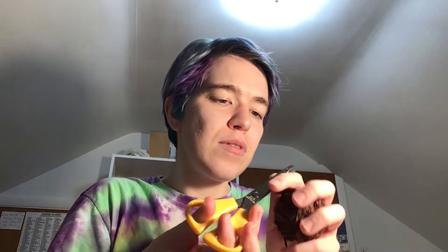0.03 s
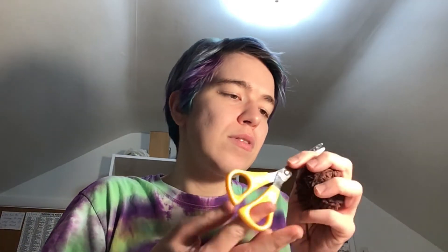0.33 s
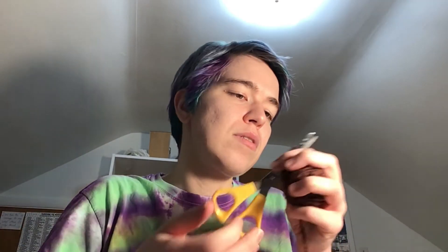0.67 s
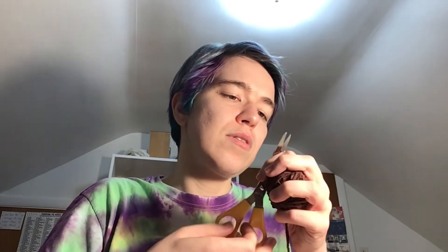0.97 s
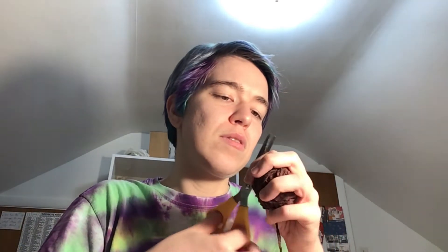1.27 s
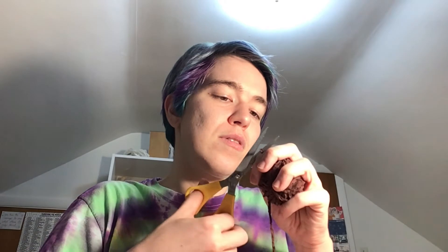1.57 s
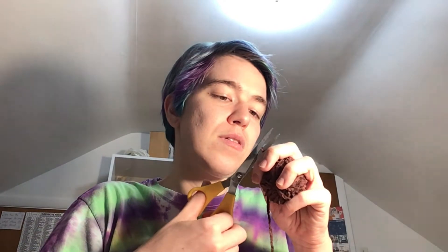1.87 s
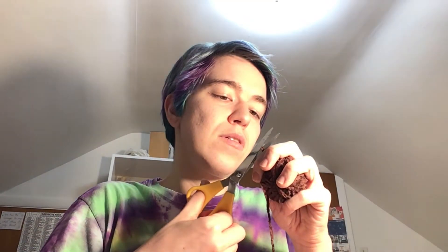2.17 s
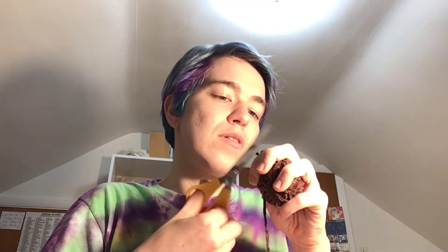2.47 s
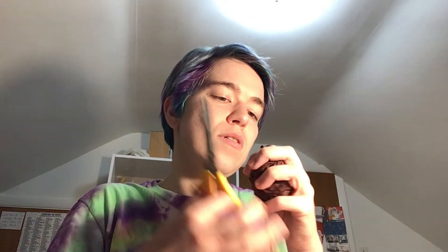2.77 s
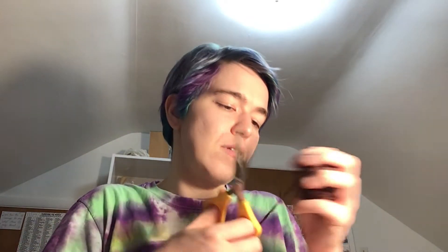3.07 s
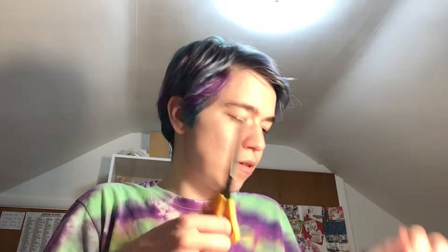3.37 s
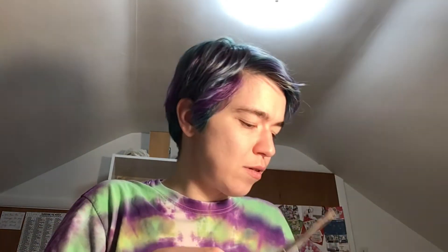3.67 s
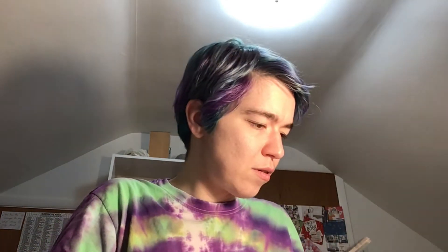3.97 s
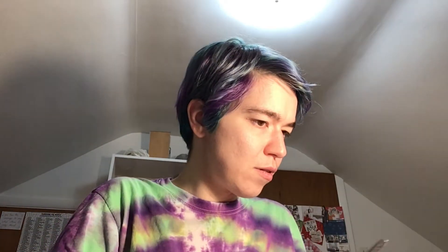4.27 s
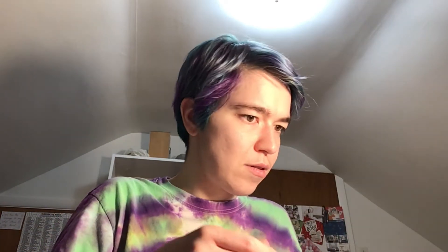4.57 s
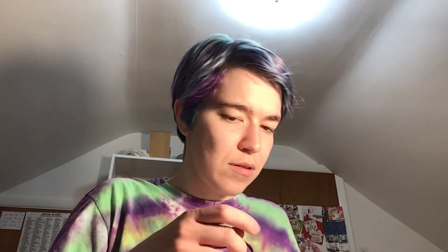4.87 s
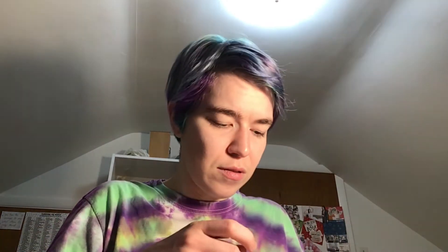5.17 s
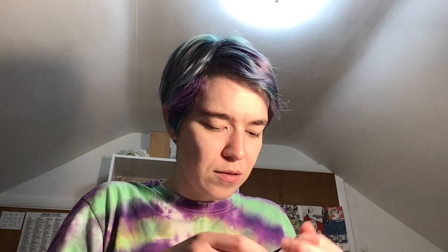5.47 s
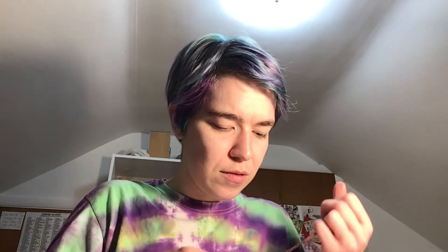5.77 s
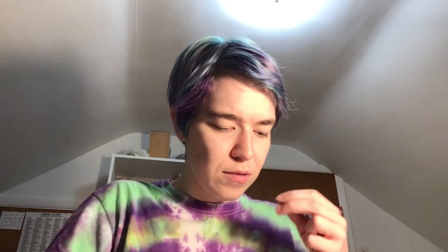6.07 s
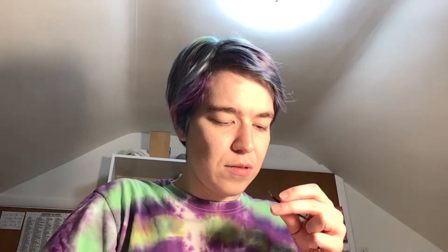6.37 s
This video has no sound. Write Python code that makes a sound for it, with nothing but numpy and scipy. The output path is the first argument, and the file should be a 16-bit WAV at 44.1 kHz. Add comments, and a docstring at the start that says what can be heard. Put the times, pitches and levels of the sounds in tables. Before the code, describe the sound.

Sparse, light clicks of scissor blades and a gentle cut through yarn sound over the faint hush of a small room. The loudest moment follows: a sharp double knock with a short metallic ring as the scissors land on a wooden desk right by the microphone. Afterwards comes a barely audible hiss of thread being pulled, then a soft thump and a sleeve sliding on the desk.

```python
"""Scissors put down on a wooden desk, close to the microphone: two loud knocks ring the board and the
steel, with a clack of the blades between them. The place is a small, quiet attic room, heard in mono.
Before that, in the hand and with more room around them, the scissors tick and shear softly at yarn.
Afterwards thread is drawn through the fingers, and a forearm bumps the desk and slides along it;
the rubbing is fibres catching and slipping. Faint room tone lies under it all."""
import sys
import numpy as np
from scipy import signal
from scipy.fft import rfft, irfft
from scipy.io import wavfile

SR = 44100
rng = np.random.default_rng(int(sys.argv[2]) if len(sys.argv) > 2 else 0)


def wrap_up_sound(samples):
    """Save the sound to the file named by the first command line argument, as 16-bit audio."""
    columns = np.atleast_2d(samples).T
    # keep every value between -1 and 1, then stretch to whole-number steps
    tamed = np.clip(columns, -1, 1)
    steps = np.round(tamed * 32767).astype(np.int16)
    wavfile.write(sys.argv[1], SR, steps)


N = 287687
TIME = np.arange(N) / SR
BLOCK = 32768   # samples for one hit and its tail
HZ = np.maximum(np.arange(BLOCK // 2 + 1) * SR / BLOCK, 1)

# rumble and hiss of the still attic: f/Hz, level/dB
ROOM_TONE = [(26, -37.5), (45, -7.5), (70, 0), (101, -3.5), (226, -9), (334, -11.5), (506, -15.5),
             (866, -18.5), (1560, -20), (2040, -22), (2730, -21), (4790, -25), (6590, -26.5),
             (10500, -29.5), (15500, -36)]
# decay of the attic's echoes: f/Hz, t60/s
ROOM_DECAY = [(150, .42), (300, .31), (600, .23), (2000, .21), (15000, .19)]
# strokes of blades through yarn, thread between fingers, sleeve on desk: peak t/s, level/dB, length/s
YARN_CUTS = [(2.788, -69, .04), (2.824, -64.5, 0.072), (2.953, -77, .11)]
THREAD_PULLS = [(5.29, -80, 0.31), (5.59, -74.5, 0.47), (5.735, -75, .3)]
SLEEVE_RUBS = [(6.174, -52, 0.027), (6.234, -53, 0.038), (6.256, -54, 0.053), (6.33, -59.5, 0.23),
               (6.38, -55.5, 0.064), (6.402, -62.5, 0.2)]
# spectra of those three kinds of rubbing: f/Hz, level/dB
YARN_SPECTRUM = [(2000, -25.5), (5000, -18), (6600, -2), (8000, -4), (9600, -1), (11000, -11.5),
                 (12800, 0.5), (16000, -14)]
THREAD_SPECTRUM = [(1500, -20.5), (4000, 2), (7000, -4), (13000, -0.5), (16000, -6.5)]
SLEEVE_SPECTRUM = [(60, 2), (170, 11), (300, -1), (440, 8.5), (620, -3.5), (1100, -6.5), (1500, 1.5),
                   (1950, 0), (2400, -9.5), (3200, -1), (4500, -13.5), (9000, -18.5), (16000, -28.5)]
# modes of the steel blades and plastic handles: f/Hz, width/Hz, level/dB
SCISSOR_MODES = [(1863, 350, -6), (2957, 550, 0.5), (3900, 520, -2.5), (5050, 900, -4.5), (6850, 970, -1),
                 (9100, 740, 0.5), (11300, 650, -4.5), (13130, 1500, -13.5)]
# scissor contacts: t/s, strength/dB, main mode f/Hz, main mode level/dB
SCISSOR_TICKS = [(0.4948, -35.5, 3430, -1), (0.5012, -37, 3000, -5), (1.3527, -28.5, 13100, 9),
                 (1.3572, -28.5, 13200, 6), (1.36, -35.5, 7400, 13), (2.297, -27.5, 14400, 3),
                 (2.2986, -38, 452, 26.5), (3.3823, -27, 4700, 14.5), (3.3829, -25.5, 12200, 3),
                 (4.7076, -5.5, 9300, -10.5), (4.7077, -10, 1820, 12.5), (4.711, -22.5, 6700, 6.5),
                 (4.7635, -11, 8860, -10), (6.1777, -39.5, 390, 34.5)]
# modes of the desk top, struck at two spots: f/Hz, width/Hz, first spot level/dB, second spot level/dB
BOARD_MODES = [(71.8, 40, -15, -12), (122.7, 45, -11.5, -6.5), (191, 26, -0.5, 3), (222, 75, 0.5, -8.5),
               (312, 72.1, 2, -9), (348, 20, -13, 0.5), (412, 60, -7.5, -7.5), (495, 220, -15.5, -9),
               (580, 30.1, -31.5, -30), (646, 6.1, -10.5, -7.5), (767, 67, -2, -2), (1090, 140, -9, -14),
               (1447, 170, 0.5, -9), (1696, 170, 2.5, -9), (1980, 210, -8, -1.5), (2382, 390, -14.5, 1.5),
               (2810, 180, 0.5, 0), (3100, 260, -16.5, -1.5), (3830, 260, -24, -7.5),
               (4417, 250, -8, -22.5), (4600, 700, -24.5, -10), (5615, 280, -17.5, -12),
               (6720, 460, -21, -14.5), (8650, 1300, -25.5, -25), (12500, 3000, -24.5, -22.5)]
# fine ring of scissors and other steel on the desk: f/Hz, t60/s, first spot level/dB, second spot level/dB
STEEL_MODES = [(696, .7, -5, 0), (1130, .7, -3.5, -6), (1442, .2, 1.5, -7.5), (1970, 0.71, -7, -12),
               (2390, 0.15, -15.5, -0.5), (2600, .22, -14.5, -6.5), (2640, .22, -4, -14.5),
               (2918, 0.2, -5.5, -5), (3300, 0.19, -17, -1), (3400, .12, -20, -5.5), (4250, .15, -19, -6),
               (4802, .15, -22, -17), (6272, .2, -25, -19.5), (7500, .18, -22, -19.5),
               (8200, 0.19, -21, -13.5)]
# room against direct sound at the first spot, weakest where the board carries best: f/Hz, level/dB
BOARD_ECHO = [(150, -5.5), (400, -6), (800, -3.5), (1600, -12), (5000, -11), (9000, -1.5), (14000, 0)]
# blows on the desk: t/s, strength/dB, contact corner f/Hz, place (0 first spot, 1 second), steel ring/dB
DESK_BLOWS = [(0.4953, -14.5, 600, 0.7, -20), (4.6151, 21, 4414, 0.12, -9), (4.7087, -1.5, 1494, 0.42, -10),
              (4.7279, -3, 5010, 0.64, 21), (4.7583, 16, 4600, 0.95, -0.5),
              (4.7604, 10.5, 4000, 0.36, -8.5), (6.1747, 12, 150, 0.88, -21), (6.1870, 20.5, 90, 0.54, -18),
              (6.23, -7, 120, 0.7, -20), (6.379, -2.5, 454, 0.94, -20)]


def from_db(db):
    """Decibels to gain."""
    return 10 ** (np.asarray(db) / 20)


def at_hz(points, hz):
    """Read a table on a log-frequency axis."""
    f, value = np.transpose(points)
    return np.interp(np.log(np.maximum(hz, 1)), np.log(f), value)


def add(track, s, sound):
    """Mix a sound in at time s."""
    start = round(s * SR)
    track[start:start + len(sound)] += sound[:N - start]


def coloured(x, spectrum):
    """Give x a spectrum; rms 1."""
    hz = np.arange(N // 2 + 1) * SR / N
    y = irfft(rfft(x) * from_db(at_hz(spectrum, hz)), N)
    return y / np.std(y)


def resonance(hz, width):
    """Response of one damped mode, 1 on top."""
    return 1 / (1 + 1j * (HZ ** 2 - hz ** 2) / (HZ * width))


def room_tone(level_db=-66):
    """The still attic: a steady, faint rumble and hiss."""
    return from_db(level_db) * coloured(rng.standard_normal(N), ROOM_TONE)


def wall_echoes(first_echo_s=0.0013, build_s=.003):
    """Response of dense echoes off the near walls, each octave dying at its own rate."""
    t = np.arange(BLOCK) / SR
    white = rfft(rng.standard_normal(BLOCK))
    swell = 1 - np.exp(-np.maximum(t - first_echo_s, 0) / build_s)
    octaves_hz = np.geomspace(62.5, 16000, 9)
    out = 0
    for hz, pick in zip(octaves_hz, np.eye(len(octaves_hz))):
        band = np.interp(np.log(HZ), np.log(octaves_hz), pick)
        decay = np.exp(-np.log(1000) * t / at_hz(ROOM_DECAY, hz))
        tail = irfft(white * band) * swell * decay
        out = out + tail * np.sqrt(np.mean(band ** 2) / np.sum(tail ** 2))
    return rfft(out)


def stroke_envelope(strokes, rise_share, edge_db=-20):
    """Each stroke swells from edge_db for a share of its length, then fades, evenly in dB."""
    power = 0
    for s, db, length_s in strokes:
        from_peak = np.maximum((s - TIME) / rise_share, (TIME - s) / (1 - rise_share)) / length_s
        power = power + from_db(db + edge_db * np.minimum(from_peak, 10)) ** 2
    return np.sqrt(power)


def fibre_friction(strokes, spectrum, slips_per_s, spread_db, rise_share):
    """Fibres catch and let go in dense slips of uneven size."""
    sizes = from_db(spread_db * np.minimum(rng.exponential(1, N), 4)) * rng.standard_normal(N)
    slips = sizes * (rng.random(N) < slips_per_s / SR)
    return coloured(slips, spectrum) * stroke_envelope(strokes, rise_share)


def chatter(decay_s, above_hz):
    """Hard parts skid for a moment as they meet, which roughens the treble of a hit."""
    burst = rng.standard_normal(BLOCK) * np.exp(-np.arange(BLOCK) / SR / decay_s)
    return rfft(burst / np.sqrt(np.sum(burst ** 2))) / (1 - 1j * above_hz / HZ)


def scissor_ticks(put_down_s=4.6, held_room_db=-4.5, lying_room_db=-10.5, lowest_hz=1200):
    """Hard little contacts ring the blades; where they touch decides which mode stands out."""
    out = np.zeros(N)
    body = sum((-1) ** k * from_db(db) * resonance(hz, width)
               for k, (hz, width, db) in enumerate(SCISSOR_MODES))
    body = body / (1 - 1j * lowest_hz / HZ)   # a small object radiates little bass
    wall_tilt_db = 1.6 * np.log2(HZ / 7000)   # the walls return more of a tick's treble than of its thud
    for s, db, ring_hz, ring_db in SCISSOR_TICKS:
        # the main mode swings a quarter cycle apart from the rest
        quarter_turn = (HZ + 1j * ring_hz) / (HZ - 1j * ring_hz)
        main_mode = from_db(ring_db) * resonance(ring_hz, width=230 + 0.17 * ring_hz) ** 2 * quarter_turn
        force = 1 + from_db(-0.5) * chatter(decay_s=0.00218, above_hz=1400)
        room_db = held_room_db if s < put_down_s else lying_room_db   # drier down by the microphone
        echoes = from_db(room_db + wall_tilt_db) * wall_echoes()
        add(out, s, from_db(db) * irfft(force * (body + main_mode) * (1 + echoes)))
    return out


def soft_contact(corner_hz):
    """A contact of finite length excites little above its corner."""
    return 1 / (1 + 1j * np.sqrt(2) * HZ / corner_hz - (HZ / corner_hz) ** 2)


def steel_ring(place, lowest_hz=1880):
    """Small steel things on the desk ring on after a blow, radiating little below lowest_hz."""
    modes = sum(from_db(first_db + place * (second_db - first_db))
                * resonance(hz, width=np.log(1000) / (np.pi * t60))
                for hz, t60, first_db, second_db in STEEL_MODES)
    return modes / (1 - 1j * np.sqrt(2) * lowest_hz / HZ - (lowest_hz / HZ) ** 2)


def desk_knocks(bass_lag_s=.016, half_lag_hz=100, second_spot_echo_db=4.0):
    """Blows ring the board; bending waves carry treble faster than bass, so each knock chirps down."""
    out = np.zeros(N)
    travel = np.exp(-2j * np.pi * bass_lag_s * half_lag_hz * np.log(1 + HZ / half_lag_hz))
    for s, db, corner_hz, place, ring_db in DESK_BLOWS:
        board = sum((-1) ** k * from_db(first_db + place * (second_db - first_db)) * resonance(hz, width)
                    for k, (hz, width, first_db, second_db) in enumerate(BOARD_MODES))
        steel = from_db(ring_db) * steel_ring(place)
        force = soft_contact(corner_hz) * (1 + from_db(-4.5) * chatter(decay_s=0.0077, above_hz=4200))
        echoes = from_db(at_hz(BOARD_ECHO, HZ) + place * second_spot_echo_db) * wall_echoes()
        add(out, s, from_db(db) * irfft(force * travel * (board * (1 + echoes) + steel)))
    return out


def scene():
    """What reaches the microphone at the desk: knocks, ticks and soft rubbing over the room tone."""
    yarn = fibre_friction(YARN_CUTS, YARN_SPECTRUM, slips_per_s=5200, spread_db=5, rise_share=.3)
    thread = fibre_friction(THREAD_PULLS, THREAD_SPECTRUM, slips_per_s=5000, spread_db=-1, rise_share=.55)
    sleeve = fibre_friction(SLEEVE_RUBS, SLEEVE_SPECTRUM, slips_per_s=10000, spread_db=1, rise_share=.25)
    air = room_tone()
    return (desk_knocks() + scissor_ticks() + yarn + thread + sleeve + air)[None]


def record(dry, low_cut_hz=50, high_cut_hz=15900):
    """The microphone drops the deep bass; the top is cut steeply."""
    low_cut = signal.butter(4, low_cut_hz, "high", fs=SR, output="sos")
    high_cut = signal.ellip(10, .1, 80, high_cut_hz, fs=SR, output="sos")
    return signal.sosfilt(high_cut, signal.sosfilt(low_cut, dry))


dry = scene()
out = record(dry)
wrap_up_sound(out)
```